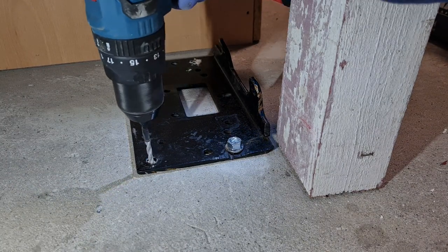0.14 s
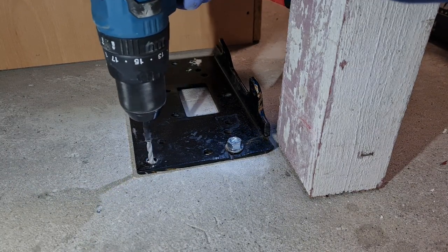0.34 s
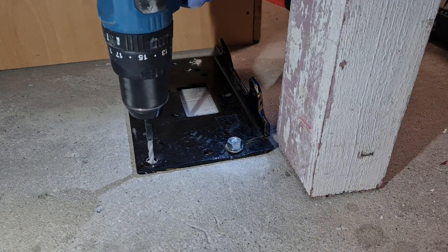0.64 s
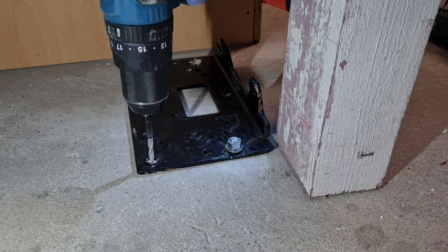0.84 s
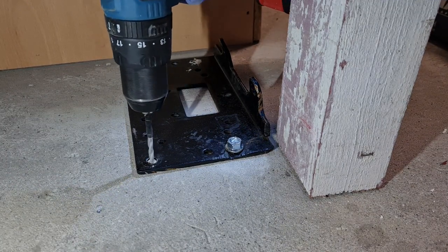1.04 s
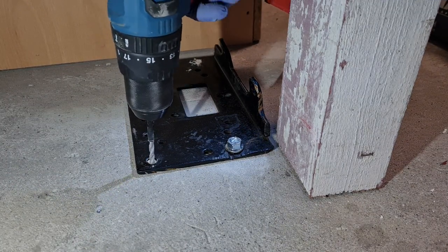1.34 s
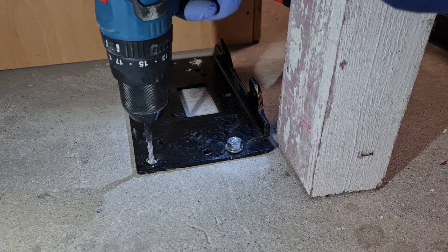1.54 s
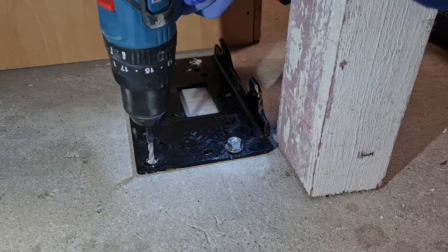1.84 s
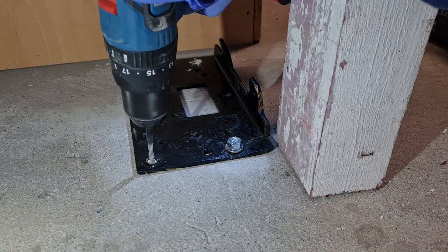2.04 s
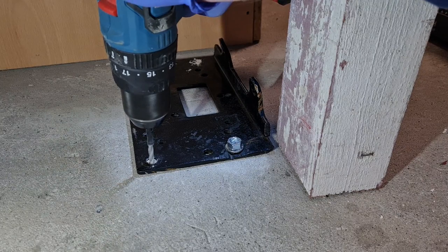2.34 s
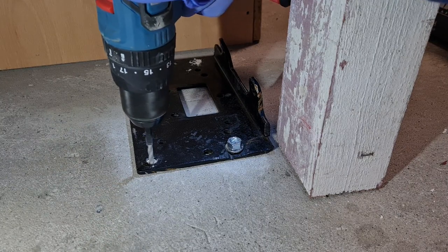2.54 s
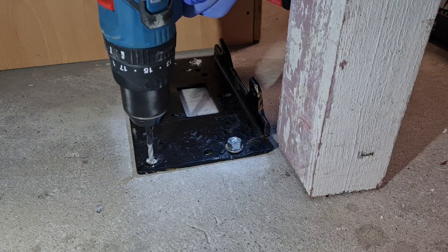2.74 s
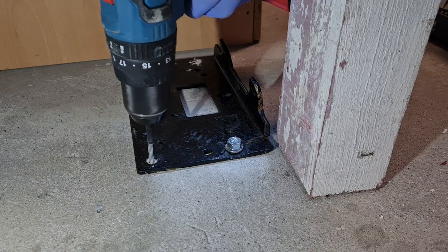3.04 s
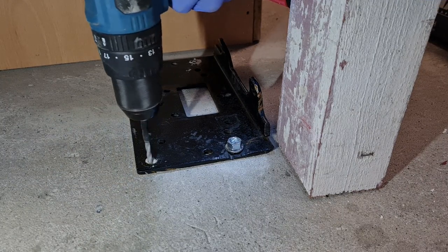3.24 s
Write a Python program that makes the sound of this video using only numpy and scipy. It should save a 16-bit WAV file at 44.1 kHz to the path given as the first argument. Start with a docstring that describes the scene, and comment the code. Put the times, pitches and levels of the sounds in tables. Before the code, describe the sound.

Close up in a slightly reverberant garage, a hammer drill rattles and grinds into concrete, slowly at first, then quicker. It stops briefly, with small metallic clicks, and restarts at a higher, full-speed buzz.

```python
"""A cordless hammer drill bores into a concrete garage floor through a steel bracket, close by.
Its ratchet strikes slowly, then faster, runs down, and after a pause spins up to full speed.
Each blow is an impulse that shakes the housing (a harmonic buzz), rattles chuck and gears and
crushes grit under the bit. In the pause the loose chuck ticks, the bit rings on the bracket
and the tool settles with a thud. The hard room adds a short reverberation."""
import sys
import numpy as np
from scipy import signal
from scipy.fft import rfft, irfft, next_fast_len
from scipy.io import wavfile
from scipy.ndimage import uniform_filter1d, map_coordinates

SR = 44100
rng = np.random.default_rng(int(sys.argv[2]) if len(sys.argv) > 2 else 0)


def inscribe(sig):
    """Save sig as 16-bit PCM at rate SR to the path in sys.argv[1].

    A 1-D sig is mono; a 2-D sig holds one channel per row.
    Samples are clipped to [-1, 1] before scaling.
    """
    pcm = np.round(np.clip(np.atleast_2d(sig).T, -1, 1) * 32767)
    wavfile.write(sys.argv[1], SR, pcm.astype(np.int16))


N = 149940

# repetition rate of the ratchet (time [s], rate [blows/s])
BLOW_RATE = [(0, 83.2), (.094, 85.1), (.256, 85.5), (.336, 84.4), (.498, 85.3), (.568, 135.4),
             (.604, 144.9), (.7, 152.1), (1.008, 151.8), (1.252, 154.3), (1.304, 153.5), (1.352, 144.1),
             (1.42, 100), (1.5, 60), (1.93, 50), (2.002, 108.9), (2.062, 170.9), (2.102, 213.4),
             (2.172, 261.8), (2.26, 270.3), (2.35, 268), (2.462, 260.5), (2.6, 262.5), (2.7, 260.2),
             (2.802, 255.4), (3.1, 258.2), (3.202, 265.6), (3.354, 263.6), (3.4, 268)]
# one table per squeeze of the trigger (time [s], rattle level [dB], grit level [dB])
DRILLING = [
    [(0.0, -23.5, -28.5), (0.314, -23.5, -27), (0.482, -21.5, -23.5), (0.54, -18, -18), (0.802, -18, -21.5),
     (1.034, -20, -22.5), (1.314, -19.5, -23.5), (1.392, -25, -30.5), (1.408, -41, -51),
     (1.436, -46.5, -51), (1.47, -57, -69.5)],
    [(1.925, -48, -41), (1.933, -32.5, -35.5), (1.941, -29.5, -32.5), (2.011, -18.5, -21),
     (2.055, -18.5, -23), (2.105, -12.5, -16.5), (2.175, -15, -15), (2.539, -18, -17.5),
     (3.081, -18.5, -19.5), (3.271, -19, -22), (3.4, -21, -23)],
]
# phase by which the left microphone port leads the right (frequency [Hz], phase [rad])
PORT_PHASE = [(40, .1), (90, 0.36), (160, .25), (280, .85), (500, 0.6), (1100, 1.35), (1720, 1.7),
              (3000, 4.8), (5250, 10.15), (8180, 15.5), (15800, 29)]


def amp(db):
    """Decibels to amplitude ratio."""
    return 10 ** (np.asarray(db) / 20)


def unit(x):
    """Normalisation to rms 1."""
    return x / np.sqrt(np.mean(x ** 2) + 1e-20)


def steady(x):
    """Normalisation by the running rms, which removes slow changes of level."""
    return x / np.sqrt(np.abs(uniform_filter1d(x ** 2, size=2600)) + 1e-9)


def along(points, hz):
    """Interpolation on a logarithmic frequency axis."""
    freqs, values = np.transpose(points)
    return np.interp(np.log(hz + 1), np.log(freqs + 1), values)


def curve(rows, column=1, **ends):
    """Linear interpolation of a time table, one value per sample."""
    columns = np.transpose(rows)
    return np.interp(np.arange(N) / SR, columns[0], columns[column], **ends)


def level(tables, column=1):
    """Amplitude envelope from dB tables, silent outside their spans."""
    gain = sum(amp(curve(rows, column, left=-np.inf, right=-np.inf)) for rows in tables)
    return uniform_filter1d(gain, size=200)


def wobble(rate):
    """Smooth random modulation: a spline with `rate` knots a second."""
    return map_coordinates(rng.standard_normal(int(N * rate / SR) + 4), [np.arange(N) * rate / SR])


def noise():
    """Two uncorrelated white noises."""
    return rng.standard_normal((2, N))


def filtered(x, response):
    """Linear filtering: the spectrum is multiplied by a frequency response."""
    size = next_fast_len(N + SR // 2)
    return irfft(rfft(x, size) * response(np.fft.rfftfreq(size, 1 / SR)), size)[..., :N]


def coloured(x, colour):
    """Spectral shaping, at rms 1."""
    return unit(filtered(x, lambda hz: amp(along(colour, hz))))


def resonance(f, hz, width):
    """Frequency response of a damped oscillator."""
    return 1j * f * width / (hz * hz - f * f + 1j * f * width)


def ringing(x, modes):
    """Modal superposition: x drives parallel resonances, at rms 1."""
    return unit(filtered(x, lambda f: sum(amp(db) * resonance(f, hz, width) for hz, width, db in modes)))


def dying(onset, t60, attack_s):
    """Free decay: a struck body's amplitude rises quickly, then falls exponentially."""
    t = np.maximum(np.arange(N) / SR - onset, 0)
    return amp(-60 * t / t60) * (1 - np.exp(-t / attack_s))


def bursts(cycles, decay_s, scatter_db, rebound, rebound_cycles, bed):
    """Impact train: the envelope of uneven, damped blows and weaker rebounds over a constant bed."""
    rate, envelope = curve(BLOW_RATE), bed
    for lag, size in ((0, 1), (rebound_cycles, rebound)):
        cycle = cycles + 1 - lag
        strengths = amp(scatter_db * rng.standard_normal(size=2000))
        age_s = (cycle % 1) / rate
        envelope = envelope + size * strengths[cycle.astype(int)] * np.exp(-age_s / decay_s)
    return steady(envelope)


def spread(pair):
    """Partial coherence: two signals mix into left and right, alike in the bass; the left port leads."""
    # likeness of the ports (frequency [Hz], coherence [0-1])
    coherence = [(60, .95), (150, 0.93), (300, 0.95), (600, 0.68), (1200, 0.83), (2400, 0.15), (5000, 0.14),
                 (12000, 0.098)]
    angle = lambda hz: np.arccos(along(coherence, hz)) / 2
    common, apart = filtered(pair, lambda hz: np.array([np.cos(angle(hz)), np.sin(angle(hz))]))
    phase_shift = lambda hz: np.exp(np.outer([1j, -1j], along(PORT_PHASE, hz)) / 2)
    ports = filtered(np.array([common + apart, common - apart]), phase_shift)
    return ports / np.std(ports.mean(axis=0))


def room_tone(gain_db=-66):
    """Stationary background noise, strongest in the bass."""
    # (frequency [Hz], spectral level [dB])
    colour = [(25, 3), (90, 7), (300, -0.5), (1500, -30.5), (15000, -26.5)]
    return amp(gain_db) * spread(coloured(noise(), colour))


def garage(x):
    """Reverberation: convolution with the hard room's diffuse tail, whose treble dies first."""
    # reverberation time (frequency [Hz], t60 [s])
    decay = [(150, 0.26), (1000, 0.38), (5000, 0.26), (15000, 0.067)]
    hz, t, spectra = signal.stft(rng.standard_normal((2, SR // 2)), SR, nperseg=256)
    tail = signal.istft(spectra * amp(-60 * t / along(decay, hz)[:, None]), SR, nperseg=256)[1]
    return signal.fftconvolve(x, tail / np.linalg.norm(tail[0]), axes=1)[:, :N]


def grip():
    """Friction at the grip makes broadband noise in the pause."""
    # (time [s], level [dB])
    rubbing = [(1.45, -61), (1.53, -56), (1.59, -56), (1.64, -56), (1.7, -49), (1.75, -71.5), (1.86, -62.5),
               (1.89, -52), (1.93, -33)]
    # (frequency [Hz], spectral level [dB])
    colour = [(120, -9), (280, 6.5), (1000, -12), (2500, -3.5), (4500, -5), (8000, -8), (12000, -7),
              (15500, -1)]
    return spread(coloured(noise(), colour)) * level([rubbing])


def scrape():
    """Sliding friction on the bracket excites the modes of the bit."""
    # (frequency [Hz], bandwidth [Hz], level [dB])
    bit_modes = [(2660, 160, -10), (4000, 130, -16), (4310, 50, 3.5), (4759, 90, -7), (6000, 80, -4.5),
                 (7639, 300, -20), (9631, 300, -19), (12300, 90, -8.5)]
    # (time [s], level [dB])
    sliding = [(1.605, -51), (1.615, -47), (1.632, -42), (1.648, -45), (1.66, -59.5), (1.72, -70.5),
               (1.8, -72)]
    return spread(ringing(noise(), bit_modes)) * level([sliding])


def ticks(relative_width=0.27):
    """Light impacts of chuck, trigger and gears each excite one broad, damped resonance."""
    # (time [s], level [dB], centre frequency [Hz], t60 [s], attack [s])
    knocks = [(1.503, -40, 2860, 0.038, .0005), (1.504, -35, 7580, .025, .0005),
              (1.503, -36, 14100, .025, .0005), (1.606, -42, 12000, .05, .0005),
              (1.692, -47, 734, 0.11, 0.0051), (1.803, -54, 10000, .08, 0.00054),
              (1.877, -35, 3670, 0.073, .0005), (1.893, -37.5, 1160, 0.48, 0.013),
              (1.932, -14, 1194, .045, 0.0005), (1.93, -28, 12500, .03, .0004)]
    out = np.zeros((2, N))
    for onset, db, hz, t60, attack_s in knocks:
        band = filtered(noise(), lambda f: resonance(f, hz, relative_width * hz))
        out += amp(db) * dying(onset, t60, attack_s) * spread(band)
    return out


def thuds(sag_per_s=1.7):
    """The tool settles on the floor: damped low oscillations of falling pitch."""
    # (time [s], level [dB], starting frequency [Hz], t60 [s])
    landings = [(1.695, -26.5, 136.5, 0.16), (1.765, -37, 84, 0.19)]
    t, out = np.arange(N) / SR, np.zeros(N)
    for onset, db, hz, t60 in landings:
        pitch = hz * np.exp(-sag_per_s * np.maximum(t - onset, 0))
        out += amp(db) * dying(onset, t60, attack_s=0.0056) * np.sin(2 * np.pi * np.cumsum(pitch) / SR)
    return out


def drone(floor_hz=305, width_hz=60):
    """Resonance: uneven blows stir a mode of the floor and room as the first squeeze changes speed."""
    # one table per swell (time [s], level [dB])
    swells = [
        [(.49, -36), (.53, -23), (.58, -36)],
        [(1.3, -34), (1.35, -26.5), (1.4, -30), (1.45, -43), (1.51, -60)],
    ]
    mode = filtered(noise(), lambda f: resonance(f, floor_hz, width_hz) ** 2)
    return spread(mode) * level(swells)


def shudder(gain_db=-1):
    """Random vibration: the whole tool bounces unevenly on the floor, making low noise."""
    # one table per squeeze (time [s], level [dB])
    bouncing = [
        [(0, -37), (.11, -43), (.17, -45), (.23, -44), (.27, -36), (.33, -45), (.48, -54), (.55, -38.5),
         (.7, -46), (1.3, -40.5), (1.37, -36), (1.49, -58)],
        [(1.93, -35), (1.96, -30), (2.04, -21.5), (2.12, -27), (2.18, -30.5), (2.33, -33.5), (2.41, -26),
         (2.49, -34), (2.66, -30), (2.71, -41.5), (3.05, -37), (3.11, -51), (3.15, -41), (3.4, -43)],
    ]
    # (frequency [Hz], spectral level [dB])
    colour = [(20, -37.5), (45, -28), (75, -6), (100, -29), (128, 6), (150, 4.5), (190, -24), (300, -12),
              (800, -64)]
    return amp(gain_db) * spread(steady(coloured(noise(), colour))) * level(bouncing)


def grit(cycles, gain_db=-1.46, flicker_db=-0.5):
    """Brittle fracture: each blow cracks the concrete under the tip in a spray of bright noise."""
    # (frequency [Hz], spectral level [dB])
    colour = [(500, -31.5), (2500, -1), (3800, -8.5), (4700, 0.5), (5300, 2.5), (6100, 1), (6800, 1),
              (7600, 1), (8300, -5.5), (9000, -7.5), (10000, -2), (12000, -2.5), (14500, 0), (16000, -2.5)]
    cracks = noise() * amp(flicker_db * wobble(2500))
    cracks *= bursts(cycles, decay_s=.0054, scatter_db=2, rebound=.51, rebound_cycles=.28, bed=.53)
    return amp(gain_db) * spread(coloured(cracks, colour)) * level(DRILLING, column=2)


def rattle(cycles, gain_db=-1.5, metal_db=-8):
    """Impact excitation: chuck and gears clatter at each blow and ring the steel parts and the bit."""
    # clatter (frequency [Hz], spectral level [dB])
    colour = [(100, -24.5), (220, -13.5), (330, -3.5), (400, -12.5), (480, -2), (560, -0.5), (660, -2),
              (780, -8), (930, 4), (1120, -1.5), (1330, 1.5), (1470, -11), (1640, -3.5), (1850, -1.5),
              (2250, -4), (2650, -8), (3200, -5), (4000, -8), (6000, -12.5), (12000, -54.5)]
    # chuck and bracket (frequency [Hz], bandwidth [Hz], level [dB])
    metal_modes = [(1134, 22, -2.5), (1584, 195, -0.5), (2619, 37, -0.5), (4573, 77, -5), (6034, 84, -2.5),
                   (7550, 220, -12.5)]
    # the loaded bit (frequency [Hz], bandwidth [Hz], level [dB])
    shank_modes = [(2460, 43, -2), (2615, 60, 4), (2772, 110, -1)]
    # its ring, one table per squeeze (time [s], level [dB])
    shank_levels = [
        [(0, -38), (.48, -35.5), (.58, -26.5), (.8, -25.5), (1.05, -29.5), (1.33, -30), (1.41, -45)],
        [(1.96, -34.5), (2.06, -29), (2.15, -24.5), (2.35, -28.5), (2.7, -24.5), (2.9, -26.5), (3.1, -36.5),
         (3.4, -38)],
    ]
    blows = bursts(cycles, decay_s=.0016, scatter_db=1.8, rebound=.6, rebound_cycles=.36, bed=.15)
    clatter = coloured(noise() * blows, colour)
    metal = amp(metal_db) * ringing(noise() * blows, metal_modes)
    shank = spread(ringing(noise() * blows, shank_modes)) * level(shank_levels)
    return amp(gain_db) * spread(clatter + metal) * level(DRILLING) + shank


def buzz(cycles, flutter_db=1.13, flutter_step_db=0.02, blur_rad=0.033, lag_cycles=.1):
    """Forced vibration: the housing sounds harmonics of the blow rate, the upper ones less steady."""
    # slow, medium and fast trigger settings (rate [blows/s])
    settings = [85, 153, 260]
    # spectrum at each setting (harmonic [number], relative level [dB])
    slow = [(1, -8), (2, -7.5), (3, -1.5), (4, 1.5), (5, -7.5), (6, -5.5), (7, -4.5), (8, -8), (9, -10),
            (10, -15), (11, -11.5), (12, -17), (13, -3.5), (14, -5.5), (15, -8), (16, -9), (17, -16.5),
            (18, -21.5), (19, -8)]
    medium = [(1, -5), (2, -0.5), (3, -5), (4, -16.5), (5, -11.5), (6, -17.5), (7, -13), (8, -8.5),
              (9, -12), (10, -24), (11, -6.5), (12, -20.5), (13, -9.5), (14, -25), (15, -16)]
    fast = [(1, 4), (2, -3), (3, -7), (4, -5), (5, -4), (6, -2), (7, -14.5), (8, -10.5), (9, -14.5),
            (10, -9.5), (11, -6.5)]
    # low and high harmonics at each setting (gain [dB])
    low_db = [6.5, 2.5, 2.5]
    high_db = [1.5, 0.5, -4]
    # low harmonics, and blows carried by the floor: one table per squeeze (time [s], level [dB])
    low_levels = [
        [(0, -26), (.148, -31.5), (.376, -25.5), (.492, -30), (.53, -26.5), (.6, -19.5), (.75, -20.5),
         (.88, -21), (1.18, -23.5), (1.25, -23.5), (1.32, -22.5), (1.35, -30.5), (1.39, -34)],
        [(1.95, -32.5), (2.0, -23.5), (2.1, -19.5), (2.17, -18), (2.22, -28.5), (2.27, -20), (2.36, -27.5),
         (2.45, -25.5), (2.52, -29), (2.73, -31.5), (2.79, -20), (2.95, -24.5), (3.1, -23), (3.16, -38),
         (3.2, -25.5), (3.4, -27.5)],
    ]
    thump_levels = [
        [(0, -21.5), (.11, -23), (.17, -38), (.22, -40), (.27, -31), (.35, -31.5), (.5, -34), (.56, -25.5),
         (.7, -26.5), (1.05, -28.5), (1.3, -32), (1.345, -30.5), (1.37, -44)],
        [(1.94, -38), (2.0, -25), (2.04, -16), (2.08, -26), (2.12, -35)],
    ]
    # response of the floor (frequency [Hz], gain [dB])
    thump_colour = [(40, -9), (85, -3.5), (130, -0.5), (175, 2), (215, -21.5), (260, -29.5)]
    rate, out = curve(BLOW_RATE), np.zeros((2, N))
    spectra = [{round(k): amp(db) for k, db in rows} for rows in (slow, medium, fast)]
    # each spectrum is normalised by its amplitude between 215 and 480 Hz
    norms = [np.sqrt(sum(g * g for k, g in spectrum.items() if 215 < k * hz < 480))
             for spectrum, hz in zip(spectra, settings)]
    low = level(low_levels) * amp(np.interp(rate, settings, low_db))
    high = level(DRILLING) * amp(np.interp(rate, settings, high_db))
    thump = level(thump_levels)
    for k in range(1, len(slow) + 1):
        hz = k * rate
        weights = [spectrum.get(k, 0) / norm for spectrum, norm in zip(spectra, norms)]
        drive = low * np.interp(hz, [180, 230, 465, 500], [0, 1, 1, 0])
        drive += high * np.interp(hz, [465, 500], [0, 1])
        gain = np.interp(rate, settings, weights) * drive + thump * amp(along(thump_colour, hz))
        gain *= amp((flutter_db + flutter_step_db * k) * wobble(28.1) - flutter_step_db * k)
        # partly aligned phases: the harmonics peak loosely together just after each blow
        phase = 2 * np.pi * (k * (cycles - lag_cycles) + .65 * rng.random()) + blur_rad * k * wobble(35)
        lead = along(PORT_PHASE, hz) / 2
        out += gain / np.cos(np.clip(lead, 0, 1)) * np.sin([phase + lead, phase - lead])
    return out


def scene(jitter_cycles=.009, stumble_s=.006, clatter_room_db=-10, buzz_room_db=-19):
    """Common excitation: one ratchet times rattle, grit and buzz, stumbling while its speed changes."""
    rate = curve(BLOW_RATE)
    change_per_s = uniform_filter1d(np.abs(np.gradient(np.log(rate))) * SR, size=1500)
    cycles = np.cumsum(rate) / SR + jitter_cycles * wobble(60) + stumble_s * change_per_s * wobble(110)
    clatter = rattle(cycles) + grit(cycles) + scrape() + ticks() + thuds() + grip()
    tone = buzz(cycles)
    room = garage(amp(clatter_room_db) * clatter + amp(buzz_room_db) * tone)
    return clatter + tone + shudder() + drone() + room + room_tone()


def record(dry, top_hz=16000):
    """Constant-power panning colours the two ports; the highest peaks clip and the top is cut."""
    # left port relative to right (frequency [Hz], level [dB])
    balance = [(60, 6), (92, -0.5), (140, 0.5), (210, -7), (330, 3), (500, -5.5), (770, 0.5), (1170, 0),
               (1790, 1.0), (2740, 0.5), (4190, 2.5), (6410, -2.5), (9810, 11.5), (15000, 3.5)]

    def panning(hz):
        """Left and right gains whose powers have a constant sum."""
        ratio = amp(along(balance, hz))
        return np.sqrt(np.array([ratio, 1 / ratio]) / np.cosh(np.log(ratio)))

    ports = filtered(dry, panning)
    return filtered(np.clip(ports, -1, 1), lambda hz: hz < top_hz)


dry = scene()
out = record(dry)
inscribe(out)
```